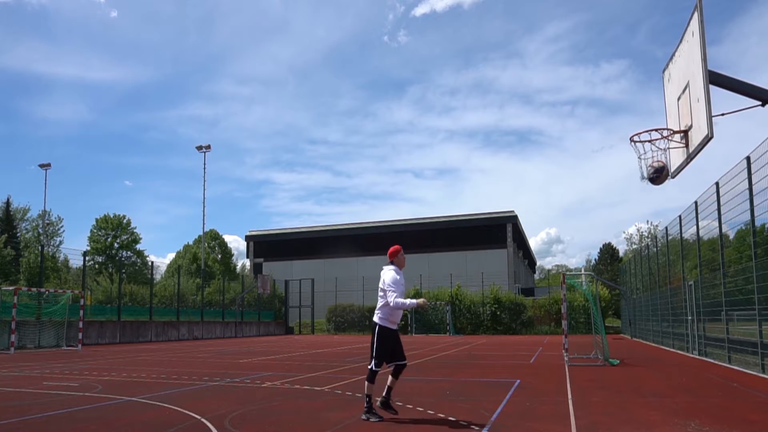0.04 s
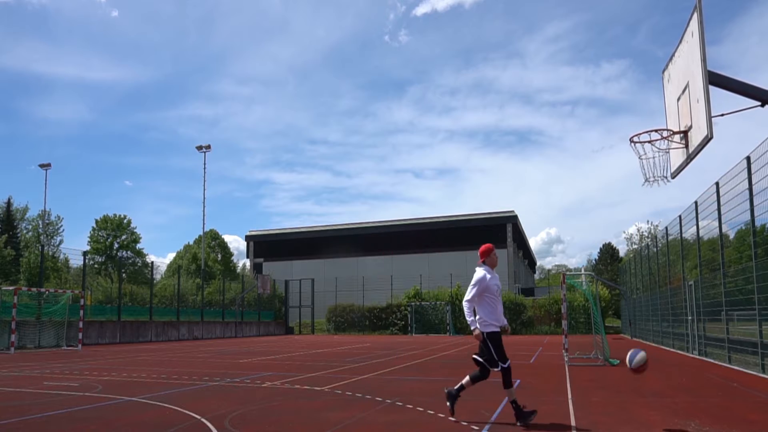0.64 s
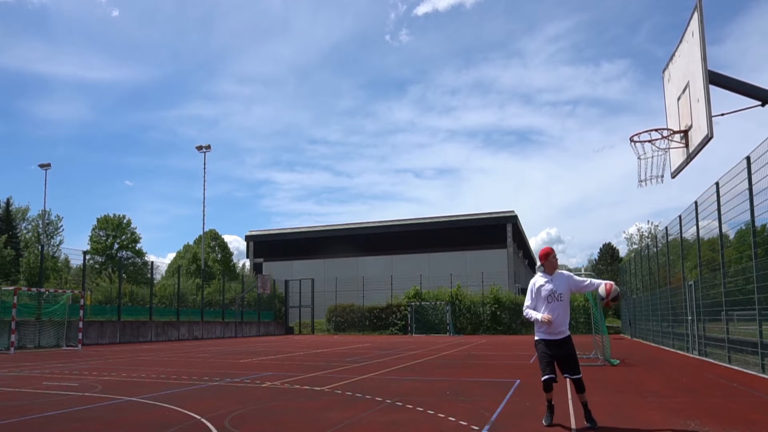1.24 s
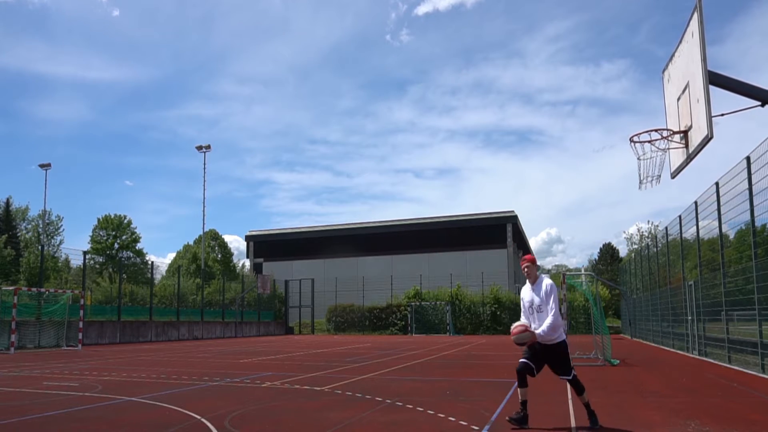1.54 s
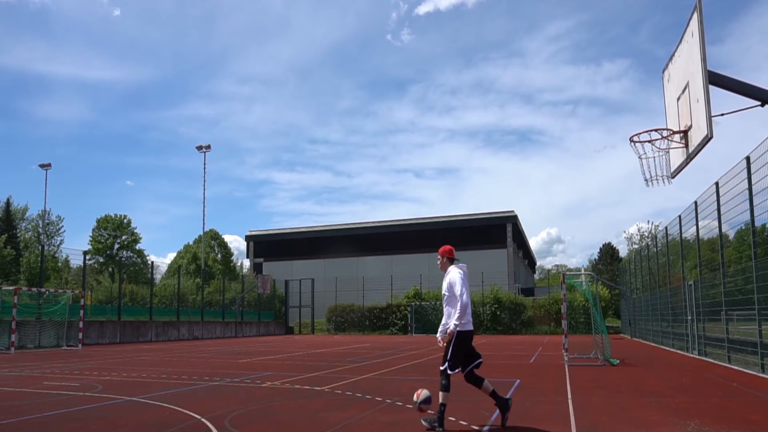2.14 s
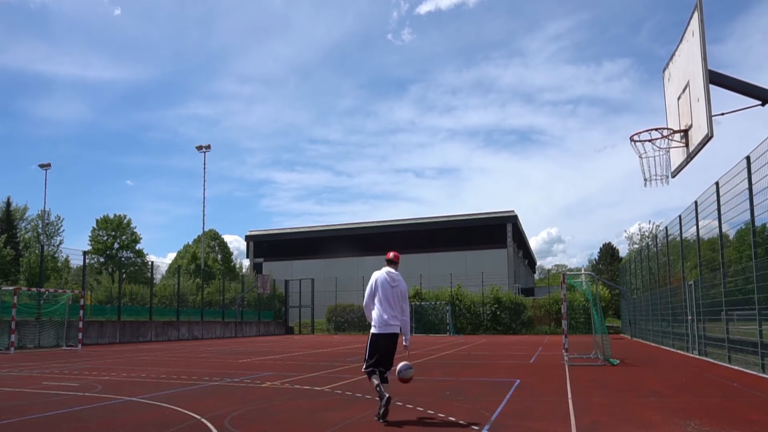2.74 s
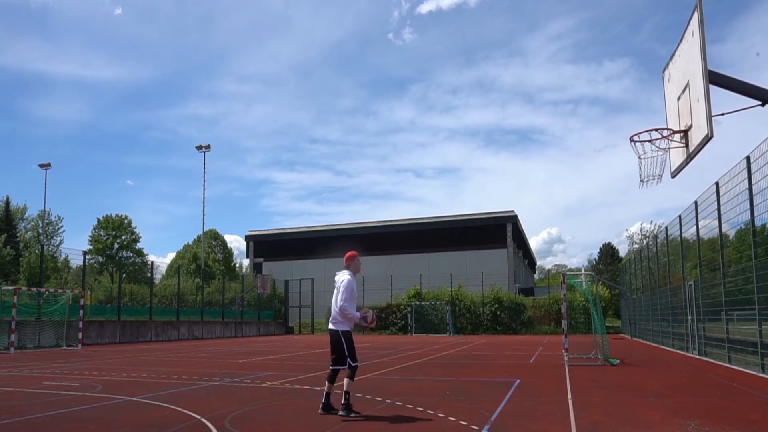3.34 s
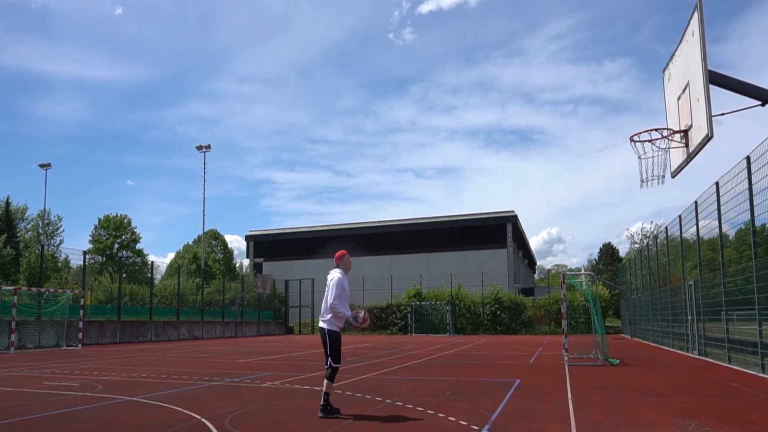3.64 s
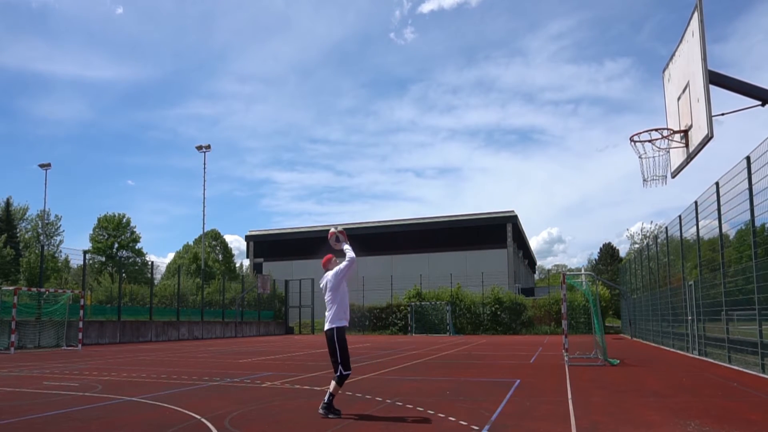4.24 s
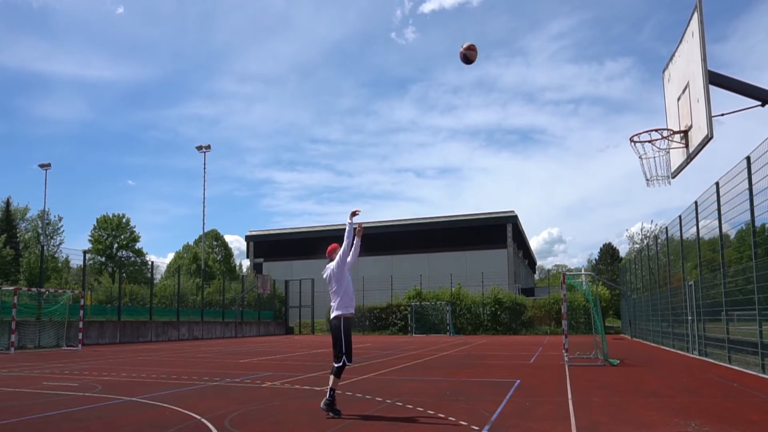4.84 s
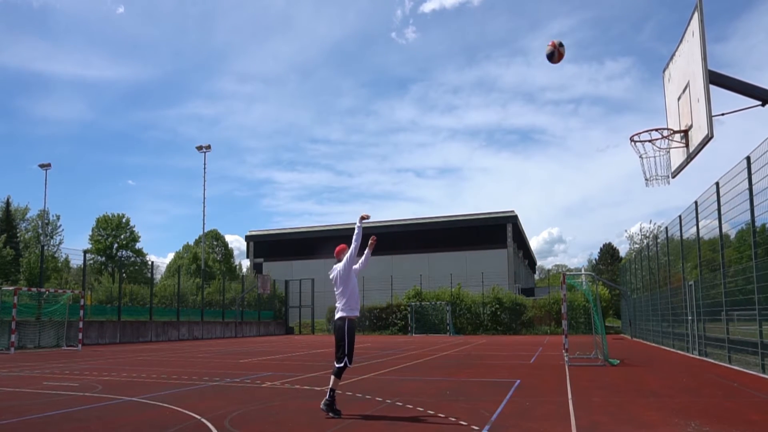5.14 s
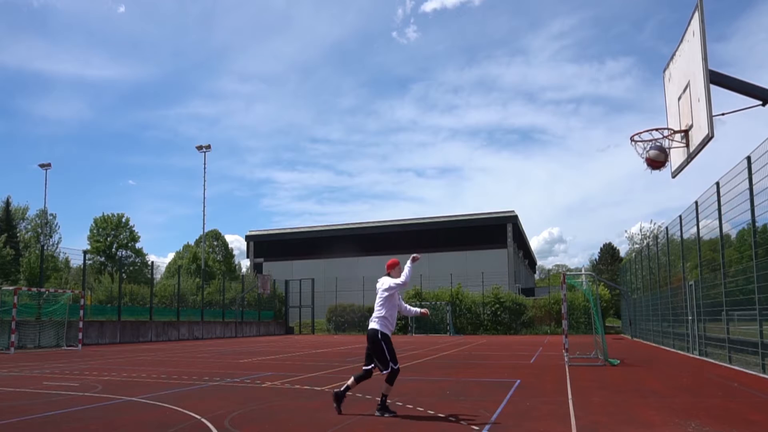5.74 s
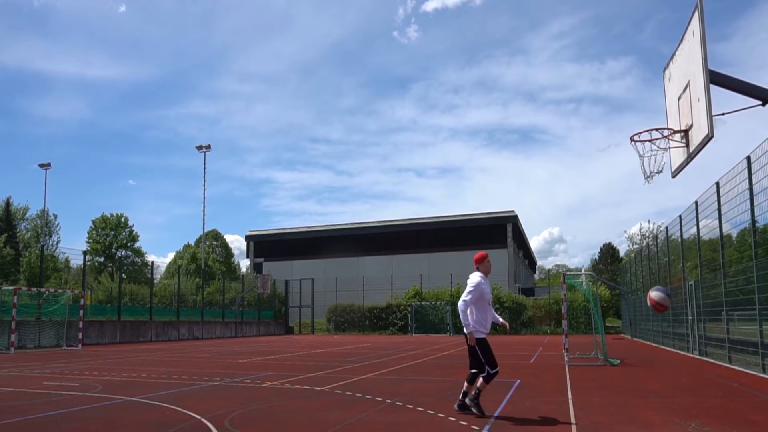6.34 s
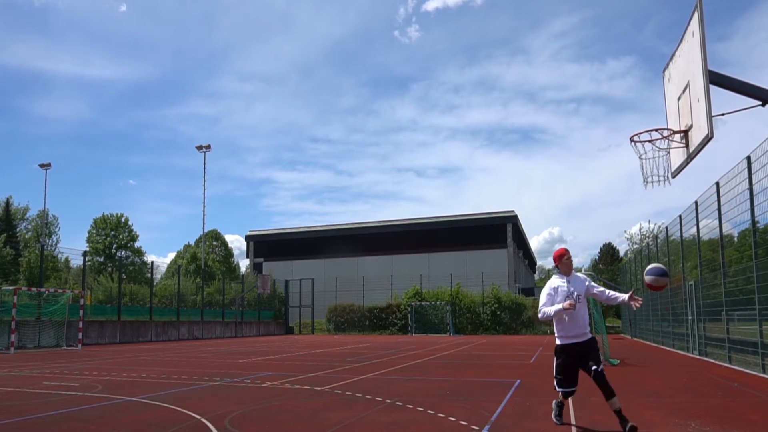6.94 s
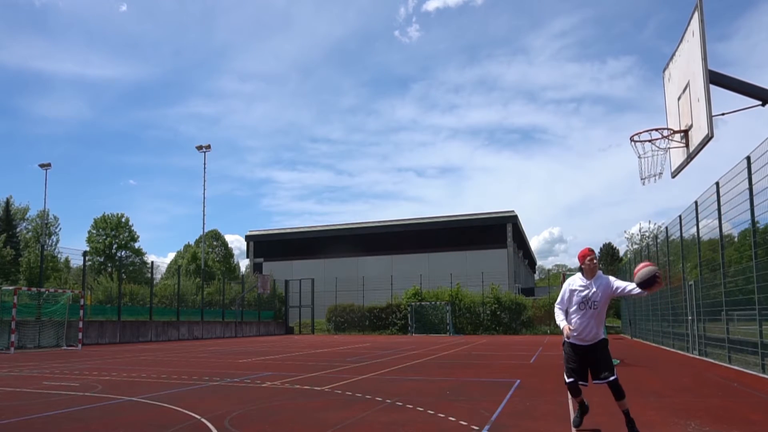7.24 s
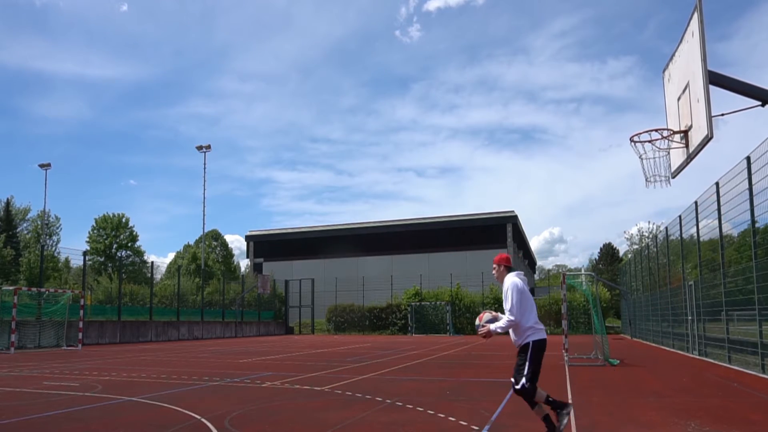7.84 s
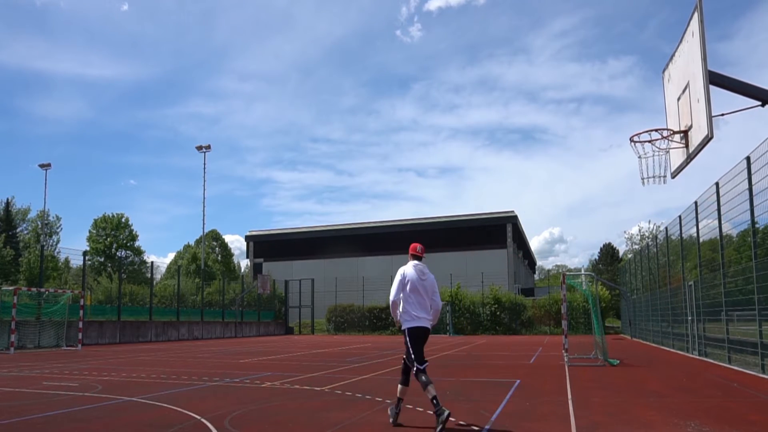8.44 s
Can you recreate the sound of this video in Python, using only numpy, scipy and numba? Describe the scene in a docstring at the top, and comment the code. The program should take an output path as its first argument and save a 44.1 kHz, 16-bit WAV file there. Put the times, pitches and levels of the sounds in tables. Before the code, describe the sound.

On a windy outdoor court, a chain net jingles brightly a little to the right as a basketball falls through, then two ringing bounces follow. Wind buffets the microphone, hardest about a third of the way in. Later the ball clatters into the hoop again, the links splash and tinkle, and it bounces once before another gust swells. Leaves, light footsteps and distant bird whistles stay faint underneath.

```python
"""Basketball practice in gusty wind

A ball drags through a steel chain net, whose links jingle and swing to rest, and bounces on an
outdoor rubber court with a thump and a ring of the air inside. Shoes pad, clothes swish, trees rustle
and a far bird whistles. Gusts buffet the microphone ports and push the recorder's gain down."""
import sys
import numpy as np
from scipy import signal
from scipy.fft import rfft, irfft
from scipy.io import wavfile
from scipy.ndimage import uniform_filter1d
from numba import njit

SR = 44100
rng = np.random.default_rng(int(sys.argv[2]) if len(sys.argv) > 2 else 0)


def store_pcm(level_fs):
    """Save levels as 16-bit WAV."""
    pcm = np.round(np.clip(level_fs, -1, 1) * 32767).astype(np.int16)
    wavfile.write(sys.argv[1], SR, np.atleast_2d(pcm).T)


N = 373968
TIME = np.arange(N) / SR

# the ball's drops through the net: t/s, length/s, dragged jingle/dB, free jingle/dB
NET_PASSES = [(-.32, 0.43, -31.5, -41), (5.539, .54, -26.5, -40)]
# single links knocking: t/s, level/dB, favoured f/Hz
CLINKS = [(0.1646, -25, 9200), (.1995, -27, 8800), (0.401, -31.5, 9600), (0.526, -33, 8715),
          (0.6517, -46, 8715), (0.9937, -35, 10525), (1.042, -38, 10525), (1.235, -56, 8715),
          (1.51, -55, 8715), (5.6598, -17.5, 10300), (5.76, -19.5, 8600), (5.8725, -23.5, 8715),
          (6.2081, -27.5, 8830), (6.325, -26, 8750), (6.489, -32, 8530), (6.7923, -32, 10525),
          (6.986, -36, 8530), (7.176, -40.5, 8700)]
NET_DRAG = dict(attack_s=.14, release_s=.025, sag_db_per_s=9)


def ball(thump_hz=94, squash_s=0.018, slap_hz=830, slap_t60=0.0094, crack_t60=0.015, skin_t60=0.17):
    """The squashed ball pushes out a low thump; its shell slaps and the air inside rings."""
    # t/s, thump/dB, shell/dB, crack/dB, snap/dB, tuning/ratio, treble left over right/dB
    bounces = [(0.854, -9.5, -9, -23, -17, 0.96, -4.5), (2.2875, -6, -6, -22.5, -11, 0.83, -1.5),
               (6.6596, -8.5, -7, -16, -17.5, 0.96, -5.5)]
    # modes of the shell and the air inside, before tuning: f/Hz, level/dB, t60/s
    ball_modes = [(201.4, -11.5, 0.15), (509, -21, 0.12), (683, -17, 0.12), (799, -16.5, 0.12),
                  (993, -14.5, 0.078), (1018, -14, 0.03), (1240, -12, 0.034), (1637, -21, 0.053),
                  (2100, -48, 0.11), (2270, -43, 0.79), (2754, -33, 0.079), (2850, -40.5, 0.41),
                  (3570, -34.5, 0.072)]
    out, t = np.zeros((2, N)), TIME[:SR // 2]
    click = signal.unit_impulse(len(t))
    for s, thump_db, shell_db, crack_db, snap_db, tuning, pan_db in bounces:
        squash = (1 - np.exp(-t / 0.003)) / (1 + (t / squash_s) ** 8)
        thump = -from_db(thump_db) * squash * np.cos(2 * np.pi * thump_hz * (t + 0.0009))
        slap = -from_db(2) * ring(click, slap_hz * tuning, slap_t60)
        ping = sum((-1) ** k * from_db(db) * ring(click, hz * tuning, t60)
                   for k, (hz, db, t60) in enumerate(ball_modes))
        grit = rng.standard_normal(len(t))
        crack = rms_one(cut(resonance(grit, 1650, 1100), 3100, "low"))
        crack *= from_db(crack_db - 60 * t / crack_t60)
        snap = cut(grit, 9400, "low", order=1) * from_db(snap_db - 60 * t / 0.0055)
        skin = rms_one(resonance(rng.standard_normal(len(t)), 640, 640))
        skin *= from_db(-21 - 60 * t / skin_t60)
        shell = from_db(shell_db) * (slap + ping + cut(skin, 1500, "low"))
        add(out, s, from_right(thump + shell + crack + snap, pan_db))
    return out


def chain(detune=0.007, busy_per_s=1400, favour_db=8, links=10):
    """Near-equal steel links knock more often the harder the net swings; gives its near and far half."""
    # modes of a free link: f/Hz, level/dB, t60/s
    link_modes = [(8340, -26, .12), (8754, 4.5, 0.24), (9000, -4.5, 0.3), (9700, -3, .12),
                  (9860, -5.5, 0.35), (10500, 0, 0.29), (11000, -32, .1), (12000, -25.5, .1),
                  (12700, -30, 0.087), (13500, -34.5, .08), (13850, -15, .08), (14400, -19, .08),
                  (15300, -25, .08)]
    swing = net_swing()
    effort = swing / swing.max()
    knocks_per_s = 50 + busy_per_s * effort
    jingle, clinks = np.zeros((2, N)), np.zeros((2, N))
    for k, size in enumerate(np.linspace(-1, 1, links)):
        knocks = grains(knocks_per_s / links, spread_db=1.5)
        at = np.flatnonzero(knocks)
        for hz, db, t60 in link_modes:
            strikes = np.zeros(N)
            strikes[at] = knocks[at] * from_db(db) * rng.standard_normal(SR // 10).take(at, mode="wrap")
            tuning = 1 + detune * (size + 0.031 * rng.normal())
            jingle[k % 2] += ring(strikes, hz * tuning, .5 * t60)  # touching links damp each other
    click = signal.unit_impulse(SR // 2)
    for k, (s, db, favoured_hz) in enumerate(CLINKS):
        for hz, mode_db, t60 in link_modes:
            # the point of contact favours one mode
            contact_db = favour_db * (np.exp(-((hz - favoured_hz) / 300) ** 2) - 1)
            tone = ring(click, hz * (1 + 0.0031 * rng.normal()), t60)
            add(clinks[k % 2], s, from_db(db + mode_db + contact_db - 2) * tone)
    # links slide over each other; dragged by the ball they make a dense bright splash
    slips = np.array([grains(4 * knocks_per_s + 400, spread_db=-4) for _ in range(2)])
    scrape = even(cut(resonance(slips, 9800, 1500), 9600, "high", order=5), 0.05)
    collisions = np.array([grains(13000, spread_db=11) for _ in range(2)])
    splash = even(cut(collisions, 10000, "high"), .03)
    shimmer = from_db(-1.5) * even(jingle, 0.25) + from_db(-10.5) * scrape
    shimmer += from_db(-10) * effort * splash
    return swing * shimmer + cut(clinks, 7300, "high", order=4)


def net_swing(settle_s=1.4, stir_db=-16.5, stir_t60=0.41):
    """How hard the net moves: dragged by the ball, then swinging to rest, stirred by each clink."""
    swing = np.zeros(N)
    for s, length, drag_db, free_db in NET_PASSES:
        free_s = TIME - s - length
        swing += from_db(drag_db) * swell(s, length, **NET_DRAG)
        swing += from_db(free_db - 60 * (free_s / settle_s) ** 2) * (free_s > 0)
    for s, db, _ in CLINKS:
        add(swing, s, from_db(db + stir_db - 60 * TIME[:SR] / stir_t60))
    return swing


def hoop(rattle_db=-14):
    """The ball snaps the net taut: hooks clatter on the ring and links crash together."""
    # jerks of the chain: t/s, clatter/dB, crash/dB, t60/s
    jerks = [(0.068, -47, -53.5, 1), (0.167, -33.5, -32, 0.048), (0.192, -32.5, -38, 0.06),
             (5.555, -25.5, -36, 0.29), (5.577, -29, -41, 0.22), (5.641, -31, -28.5, 0.087),
             (5.673, -32.5, -25.5, 0.2), (5.783, -35, -49, 0.068), (6.038, -36.5, -37, 0.17),
             (6.06, -28.5, -37, 0.068)]
    # resonances of hoop and hooks: f/Hz, width/Hz, level/dB
    hoop_modes = [(474, 69, 6), (840, 150, 1), (1180, 104, 2), (1452, 192, 8.5), (1554, 320, 5),
                  (2060, 570, -4), (3160, 950, -12), (4460, 750, -13)]
    clatter, crash, t = np.zeros(N), np.zeros(N), TIME[:SR // 2]
    for s, clatter_db, crash_db, t60 in jerks:
        add(clatter, s, from_db(clatter_db - 60 * t / t60))
        add(crash, s, from_db(crash_db - 60 * t / t60))
    for s, length, drag_db, _ in NET_PASSES:  # the hooks rattle as long as the ball drags the net
        clatter += from_db(drag_db + rattle_db) * swell(s, length, **NET_DRAG)
    knocks = grains(1500, spread_db=1.0)
    body = sum((-1) ** k * from_db(db) * resonance(knocks, hz, width)
               for k, (hz, width, db) in enumerate(hoop_modes))
    steel = resonance(grains(5600, spread_db=-8), 12700, 6400)
    return clatter * even(body, 0.0063) + crash * even(steel, 0.0082)


def hooks(count=5, level_db=-50, hz=13900, detune=0.028, wait_s=.19, span_s=0.33):
    """The small hooks tinkle at random as the free net sways; each chatters before it settles."""
    out, click = np.zeros(N), signal.unit_impulse(SR // 2)
    for s, length, _, _ in NET_PASSES:
        for when in (np.arange(count) + rng.random(count)) / count:
            for rebound in range(4):
                at = s + length + wait_s + span_s * when + rebound * rng.uniform(.008, .0099)
                add(out, at, from_db(level_db) * ring(click, hz * (1 + detune * rng.normal()), t60=.17))
    return out


def wind(lump_db=3.41, own_db=-6.5, travel_hz=390, right_lift_db=3, crackle_db=-13):
    """Eddies sweep over both microphone ports; faster ones reach higher and crackle more."""
    # turbulence spectrum before its roll-off: f/Hz, level/dB
    turbulence = [(20, -21), (30, -16), (50, -2.5), (75, 1), (115, 1), (170, -4), (240, -4.5), (500, -11),
                  (1000, -12), (4000, -20)]
    # the hardest buffets: t/s, level over the gust/dB, length/s, fastest eddies/Hz
    hard_buffets = [(0.438, -7, 0.022, 440), (1.545, -7, 0.02, 430), (2.354, -11, .0095, 840),
                    (2.422, -13.5, .007, 770), (2.509, -7.5, .0065, 736), (2.693, -2.5, .01, 1150),
                    (2.736, 5.5, .03, 1100), (2.782, -2.5, .062, 800), (2.921, -7.5, .024, 645),
                    (2.998, -12.5, .035, 784), (3.07, -9, .0061, 870), (4.698, -13.5, .008, 570),
                    (4.838, -5.5, .012, 510), (4.871, -11, 0.014, 613), (4.968, -3, 0.0072, 680),
                    (5.076, -8.5, .016, 560), (5.495, -14, 0.022, 512), (8.035, -12, 0.0067, 648),
                    (8.253, -10.5, .045, 750), (8.307, -7.5, .014, 804), (8.394, -12, .025, 730)]
    force_db, eddy_hz = airflow()
    lumps = drift(33.7)
    flow = even(noise(turbulence), 0.024) * from_db(force_db - 3.5 + lump_db * lumps)
    # the running flow stays dull; the fastest eddies come in separate buffets
    steady_hz = eddy_hz / np.hypot(1, eddy_hz / 650)
    corner_hz = np.clip(steady_hz * from_db(lumps), 20, 2000)
    shared, own = [roll_off(layer, corner_hz) for layer in flow]
    air = cut(rng.standard_normal(N + SR), 230, "high")
    tearing = resonance(grains(540, spread_db=9.5), 1200, 700)
    crackle = even(cut(tearing, 1900, "low", order=3), .03)
    for s, over_db, length, hz in hard_buffets + lesser_buffets(eddy_hz):
        at = int(s * SR)
        shape = burst(length, rise=23)[:N - at]
        span = slice(at, at + len(shape))
        shape *= from_db(over_db + force_db[span])
        swirl = even(roll_off(air[at:at + SR // 3], np.full(SR // 3, float(hz))), 0.019)
        add(shared, s, from_db(1) * cut(shape * swirl[-len(shape):], 1.06 * hz, "low"))
        add(shared, s, from_db(crackle_db) * (hz / 1000) ** 2 * shape * crackle[span])
    own = cut(own, 64, "high", order=1) * from_db(own_db)  # only small eddies differ between the ports
    # each eddy meets the right port a little later than the left, and more sharply
    pole = np.exp(-2 * np.pi * travel_hz / SR)
    right = signal.lfilter([-pole, 1], [1, -pole], shared - own)
    right += (from_db(right_lift_db) - 1) * cut(right, 860, "high", order=1)
    return np.array([shared + own, right])


def airflow(breeze_db=-27, breeze_hz=135, attack_s=0.052, wake_db=-16):
    """Force (dB) and eddy speed (Hz) of gusts over a light breeze; weaker air trails each gust."""
    # t/s, length/s, force/dB, fastest eddies/Hz
    gusts = [(-.03, 0.019, -7, 347), (0.056, 0.11, -8.5, 244), (0.354, 0.2, -17.5, 276),
             (0.593, 0.12, -16.5, 172), (1.336, 0.16, -20, 153), (1.507, 0.2, -12, 278),
             (1.872, 0.19, -15.5, 169), (2.163, 0.061, -10, 120), (2.304, 0.36, 1.5, 484),
             (2.729, 0.095, 5, 1050), (2.86, 0.27, 3, 620), (3.282, 0.17, 0, 370), (3.517, 0.15, -6, 334),
             (3.974, 0.39, -5.5, 277), (4.426, 0.34, -9, 140), (4.603, 0.3, -4, 380),
             (4.962, 0.31, -6.5, 360), (5.336, 0.34, -2, 358), (5.764, 0.655, -11.5, 238),
             (6.413, 0.15, -16.5, 163), (6.847, .14, -19, 142), (7.252, 0.05, -13.5, 190),
             (7.343, 0.27, -12, 477), (7.726, 0.19, -8, 263), (7.919, 0.2, -3.5, 404),
             (8.211, 0.38, 4.5, 636)]
    power = np.full(N, from_db(breeze_db) ** 2)
    weighted_hz = power * breeze_hz
    for s, length, db, hz in gusts:
        blow = swell(s, length, attack_s, release_s=0.072, sag_db_per_s=8)
        wake = from_db(wake_db) * swell(s, length, attack_s, release_s=0.51)
        shape = np.maximum(blow, wake)
        gust_power = (from_db(db) * shape) ** 2
        power += gust_power
        weighted_hz += gust_power * hz * shape ** 0.21  # eddies slow down as a gust dies
    return 10 * np.log10(power), weighted_hz / power


def lesser_buffets(eddy_hz, max_per_s=15, full_hz=518, over_db=-20.5, mean_s=.013, tries=300):
    """Rows of small random buffets; their rate grows with the eddy speed squared, up to full_hz."""
    rows = []
    for when, chance, size in rng.random((tries, 3)):
        hz = min(eddy_hz[int(when * N)], full_hz)
        if chance < max_per_s * (hz / full_hz) ** 2 * N / SR / tries:
            rows.append((when * N / SR, over_db, mean_s * (.5 + size), 1.26 * hz))
    return rows


def player():
    """Soft pats, scuffs and ticks of shoes and hands, each a burst of band noise."""
    # t/s, level/dB, length/s, f/Hz, width/Hz
    touches = [(0.798, -36.5, 0.0052, 596, 700), (1.241, -38.5, 0.012, 685, 300),
               (1.477, -41, 0.0099, 450, 500), (3.401, -37, 0.0042, 7500, 10300),
               (7.201, -46.5, 0.071, 4900, 10200), (7.288, -37, 0.019, 646, 400),
               (7.543, -49, 0.009, 2500, 6000), (7.92, -39, 0.0026, 9000, 7000),
               (7.991, -27, 0.0025, 6500, 9000)]
    out = np.zeros(N)
    for s, db, length, hz, width in touches:
        shape = burst(length)
        rub = cut(resonance(rng.standard_normal(len(shape)), hz, width), 2 * hz, "low")
        add(out, s, from_db(db) * shape * rms_one(rub))
    return out


def surroundings(leaves_db=-43.5, flutter_db=1.2, alike_hz=1300, air_db=-65):
    """Leaves rustle all round, alike at both ports in the bass; a thin hiss swells as clothes swish."""
    # spectrum of trees and far surroundings: f/Hz, level/dB
    ambience = [(60, 9.5), (250, 4), (600, 1), (1000, -1), (1600, -4), (2800, -8), (4200, -13), (6000, -22),
                (9000, -24.5), (13000, -29.5), (16000, -36)]
    # clothes of the running player: t/s, length/s, level/dB
    swishes = [(1.857, .47, -60), (6.7, 1.61, -61.5)]
    mid, side = noise(ambience)
    side = cut(side, alike_hz, "high", order=1)
    mid = mid + 0.36 * cut(mid, alike_hz, "low", order=1)
    leaves = rms_one(np.array([mid + side, mid - side])) * from_db(leaves_db + flutter_db * drift(8))
    swish = sum(from_db(db) * swell(s, length, attack_s=0.49, release_s=0.02)
                for s, length, db in swishes)
    hiss = noise([(1500, -19.5), (4500, 3), (8000, 0.5), (12000, 1.5), (16000, -6.5)])
    return (leaves + hiss * (from_db(air_db) + swish)) * from_db([[-1.6], [1.3]])


def bird(level_db=-54.5, fall=0.024, waver=0.025):
    """A far bird's thin whistles, each wavering and sinking a little in pitch."""
    # t/s, length/s, f/Hz
    notes = [(.41, 0.04, 4520), (.475, 0.031, 4700), (1.858, 0.13, 3210), (2.178, 0.18, 3020),
             (2.382, 0.15, 3700), (2.557, 0.14, 3500), (2.835, .23, 3390), (3.003, 0.15, 2800),
             (3.25, .24, 2500)]
    out = np.zeros(N)
    for s, length, start_hz in notes:
        n = int(length * SR)
        wobble = rms_one(cut(rng.standard_normal(SR), 120, "low"))[:n]
        hz = start_hz * np.linspace(1, 1 - fall, n) * (1 + waver * wobble)
        add(out, s, from_db(level_db) * np.hanning(n) * np.sin(2 * np.pi * np.cumsum(hz) / SR))
    return out


def early_reflections(x, level_db=-8, t60=0.027):
    """Backboard, ground and fence add a separate cluster of reflections at each port."""
    t = TIME[:SR // 20]
    paths = rng.standard_normal((2, len(t))) * from_db(-60 * t / t60) * (t > .001)
    paths /= np.sqrt(np.sum(paths ** 2, axis=1, keepdims=True))
    return x + from_db(level_db) * signal.fftconvolve(x, paths, axes=1)[:, :N]


def court_tail(x, level_db=-24, t60=0.98, dull_hz=5000):
    """Fence, trees and a far wall scatter a faint tail."""
    t = TIME[:SR]
    scatter = cut(rng.standard_normal((2, SR)), dull_hz, "low", order=1)
    tail = scatter * from_db(-60 * t / t60) * (t > .012)
    tail /= np.sqrt(np.sum(tail ** 2) / 2)
    return from_db(level_db) * signal.fftconvolve(x, tail, axes=1)[:, :N]


def from_right(x, pan_db, shadow_hz=450):
    """Sound from the right reaches the left port two samples late, its treble shaded."""
    treble = cut(x, shadow_hz, "high", order=1)
    left, right = x + treble * (from_db([[pan_db / 2], [-pan_db / 2]]) - 1)
    return np.array([np.r_[0, 0, left[:-2]], right])


def gain_control(x, limit_db=-14, detect_s=0.032, slow_share=0.94, slow_attack_s=0.28):
    """A quick limiter ducks the scene in strong gusts; a slow stage holds a share of the cut."""
    power = np.abs(uniform_filter1d(np.mean(x ** 2, axis=0), int(detect_s * SR)))
    excess_db = np.maximum(10 * np.log10(power + 1e-12) - limit_db, 0)
    quick_db = release(excess_db, db_per_s=27.5)
    pole = np.exp(-1 / (slow_attack_s * SR))
    slow_db = release(slow_share * signal.lfilter([1 - pole], [1, -pole], quick_db), db_per_s=3)
    return x * from_db(-np.maximum(quick_db, slow_db))


def release(cut_db, db_per_s):
    """Catch each cut in gain and let it go at a steady rate."""
    return np.maximum.accumulate(cut_db + db_per_s * TIME) - db_per_s * TIME


def from_db(db):
    """Decibels to gain."""
    return 10 ** (np.asarray(db) / 20)


def rms_one(x):
    """Scale to unit power."""
    return x / np.sqrt(np.mean(x ** 2) + 1e-20)


def even(x, seconds):
    """Hold the short-term power at 1."""
    power = np.mean(np.atleast_2d(x) ** 2, axis=0)
    return x / np.sqrt(np.abs(uniform_filter1d(power, max(int(seconds * SR), 2))) + 1e-12)


def cut(x, hz, kind, order=2):
    """Butterworth filter."""
    sos = signal.butter(order, np.clip(hz, 10, SR * .45), kind, fs=SR, output="sos")
    return signal.sosfilt(sos, x + 1e-18)


@njit
def roll_off(x, hz):
    """Moving low-pass: one pole, a Butterworth pair, and one more pole higher up."""
    w = 2 * np.pi * hz / SR
    out = np.zeros(len(x))
    first = band = low = last = 0.
    for i in range(len(x)):
        first += (1 - np.exp(-w[i])) * (x[i] - first)
        low += w[i] * band
        band += w[i] * (first - low - np.sqrt(2) * band)
        last += (1 - np.exp(-2.5 * w[i])) * (low - last)
        out[i] = last
    return out


def ring(clicks, hz, t60):
    """A unit click sets a sine of height 1 ringing."""
    r, w = from_db(-60 / (t60 * SR)), 2 * np.pi * hz / SR
    return signal.lfilter([0, np.sin(w)], [1, -2 * r * np.cos(w), r * r], clicks + 1e-18)


def resonance(x, hz, width):
    """A broad resonance with gain 1 at its peak."""
    r, w = np.exp(-np.pi * width / SR), 2 * np.pi * hz / SR
    feed = np.array([1, 0, -1]) * (1 - r * r) / 2
    return signal.lfilter(feed, [1, -2 * r * np.cos(w), r * r], x + 1e-18)


def noise(spectrum):
    """Two unrelated noises shaped by rows of f/Hz, level/dB."""
    hz, db = np.transpose(spectrum)
    bins = np.maximum(np.arange(N // 2 + 1) * SR / N, 1)
    gain = from_db(np.interp(np.log(bins), np.log(hz), db)) * (bins > 10)
    return rms_one(irfft(rfft(rng.standard_normal((2, N))) * gain, N))


def drift(hz):
    """A slow random wander of unit power."""
    return rms_one(cut(rng.standard_normal(N + SR), hz, "low")[SR:])


def grains(per_s, spread_db):
    """Random contacts of uneven strength."""
    contacts = (rng.random(N) < per_s / SR) * rng.choice([-1, 1], N)
    return contacts * from_db(spread_db * np.minimum(rng.exponential(1, N), 4))


def burst(length, rise=10):
    """An envelope that rises fast, holds for about its length and dies."""
    u = np.arange(int(3 * length * SR)) / (length * SR)
    return (1 - np.exp(-rise * u)) / (1 + u ** 6)


def swell(s, length, attack_s, release_s, sag_db_per_s=0):
    """An envelope that rises, sags while it holds and dies away."""
    t = np.maximum(TIME - s, 0)
    rise = np.sin(np.pi / 2 * np.minimum(t / attack_s, 1)) ** 2
    fade = np.exp(-np.clip((t - length) / release_s, 0, 20))
    return rise * from_db(-sag_db_per_s * t) * fade


def add(out, s, sound):
    """Mix a sound in at time s."""
    at = max(int(s * SR), 0)
    out[..., at:at + sound.shape[-1]] += sound[..., :N - at]


def scene():
    """Basket, ball and player sit to the right; wind, trees and bird fill in around them."""
    near, far = chain()
    halves = near + hoop(), far + hooks()
    basket = sum(early_reflections(from_right(half, pan_db=-7)) for half in halves)
    play = ball() + basket + from_right(player(), pan_db=-3.5)
    return play + court_tail(play) + wind() + surroundings() + bird()


def record(dry):
    """The gain gives way to the wind, the highest peaks are rounded and the top is cut."""
    top_cut = signal.ellip(12, .1, 90, 15850, fs=SR, output="sos")
    return signal.sosfilt(top_cut, np.tanh(gain_control(dry)))


dry = scene()
out = record(dry)
store_pcm(out)
```